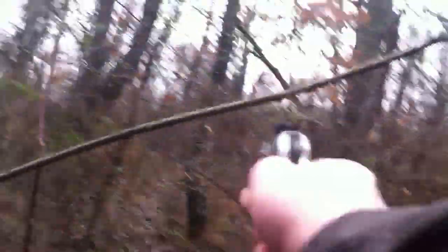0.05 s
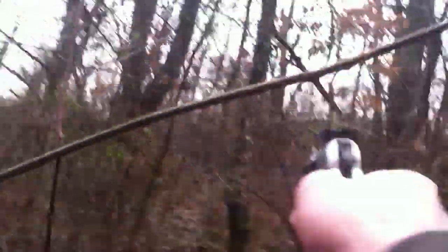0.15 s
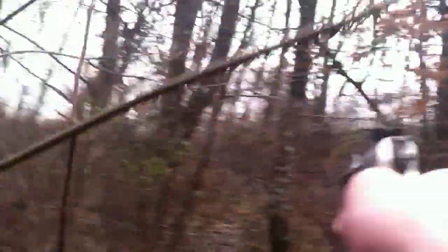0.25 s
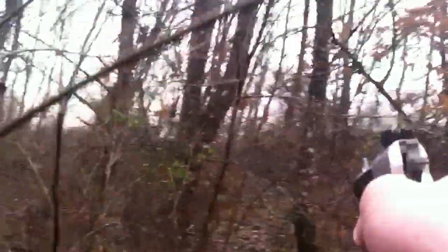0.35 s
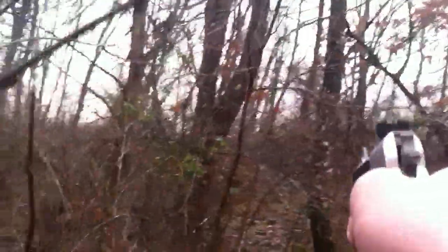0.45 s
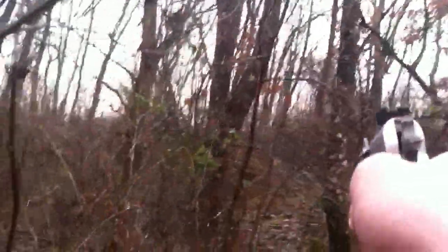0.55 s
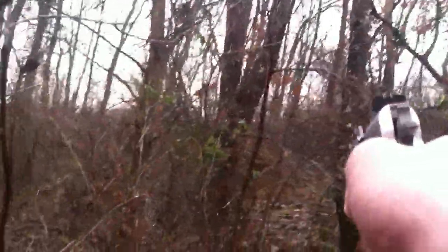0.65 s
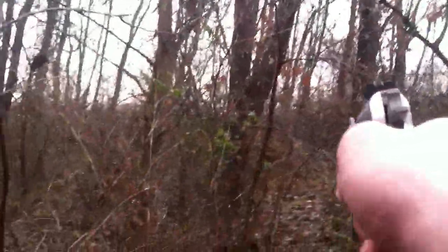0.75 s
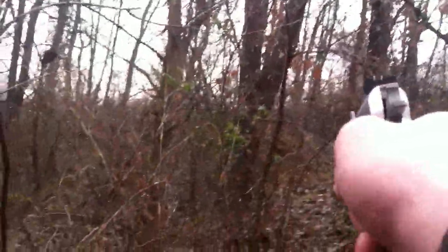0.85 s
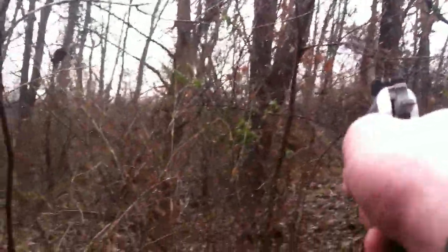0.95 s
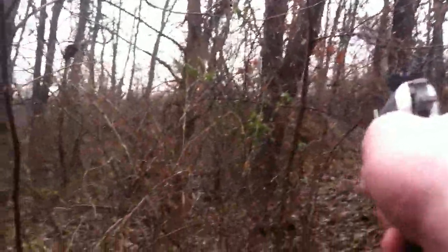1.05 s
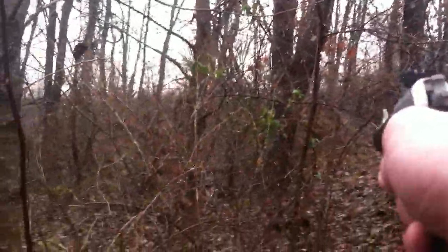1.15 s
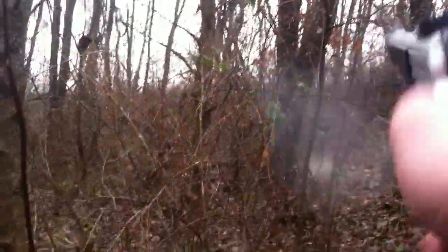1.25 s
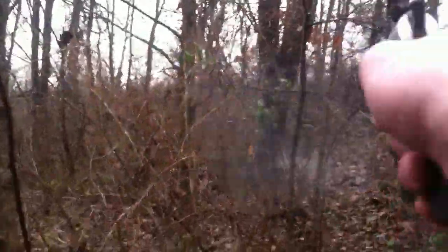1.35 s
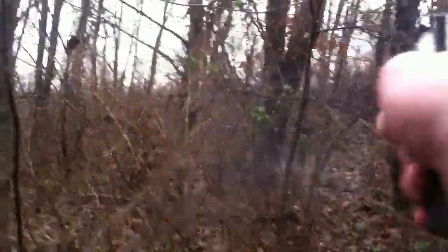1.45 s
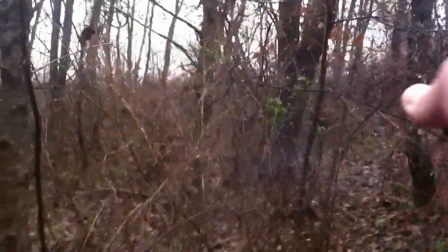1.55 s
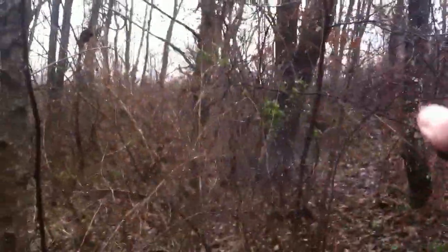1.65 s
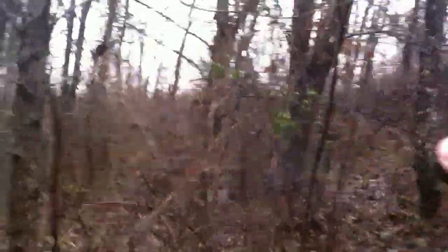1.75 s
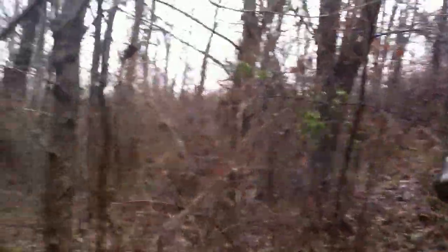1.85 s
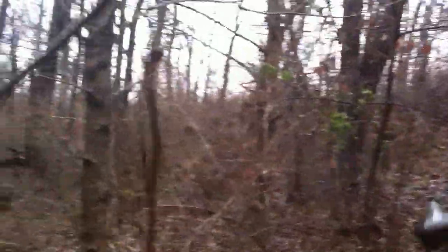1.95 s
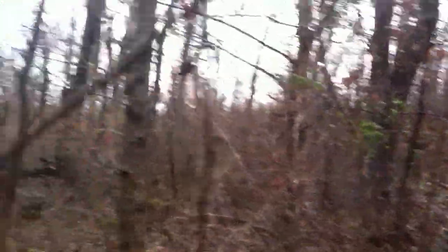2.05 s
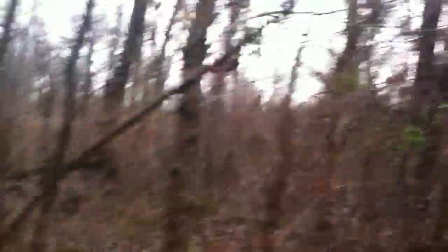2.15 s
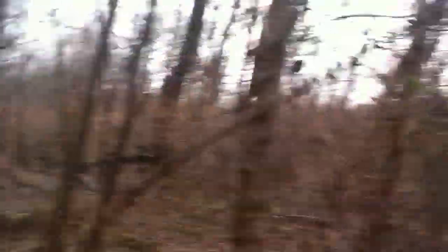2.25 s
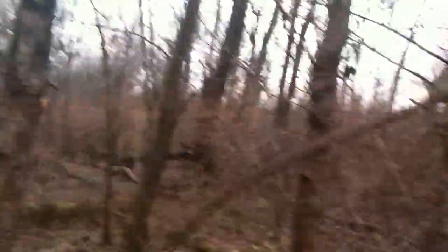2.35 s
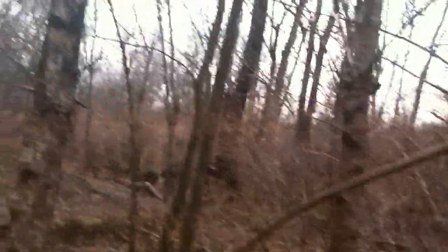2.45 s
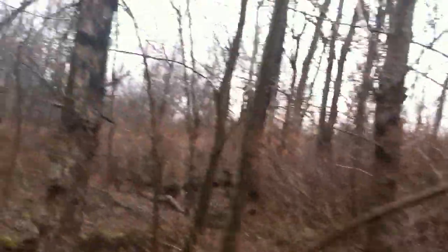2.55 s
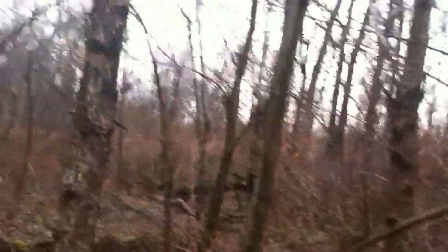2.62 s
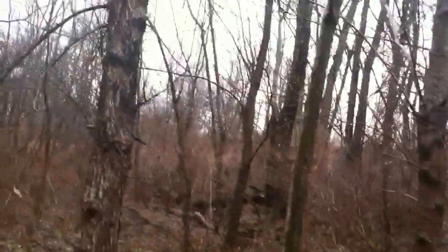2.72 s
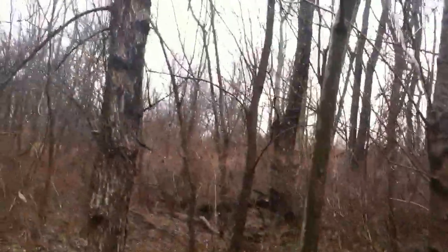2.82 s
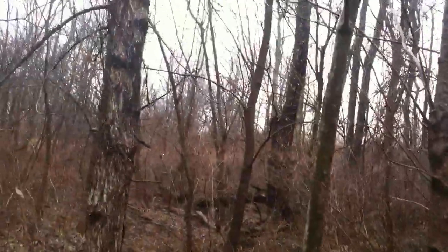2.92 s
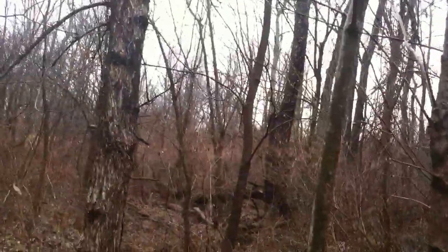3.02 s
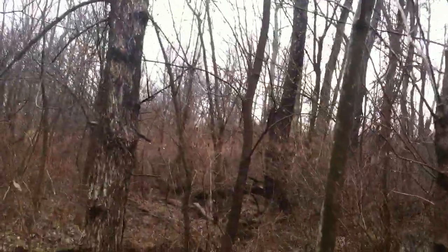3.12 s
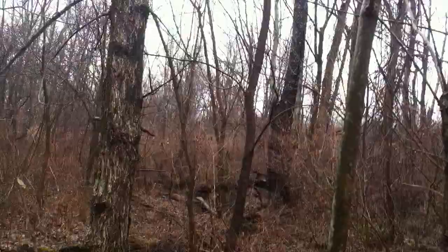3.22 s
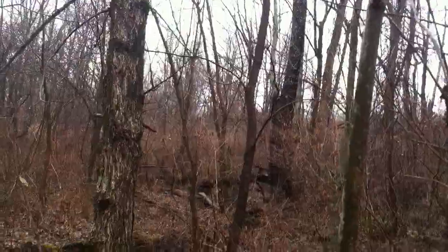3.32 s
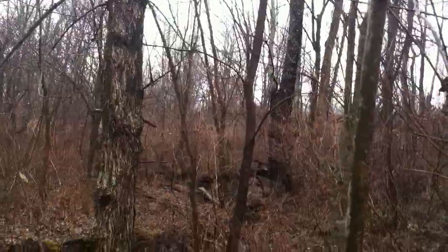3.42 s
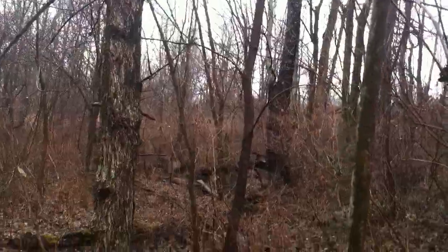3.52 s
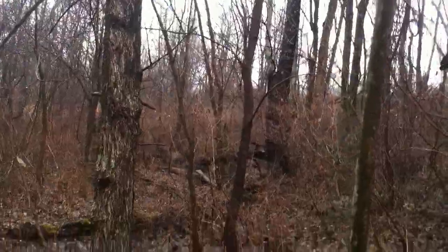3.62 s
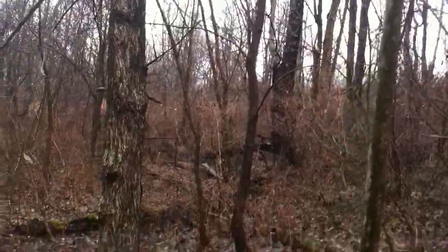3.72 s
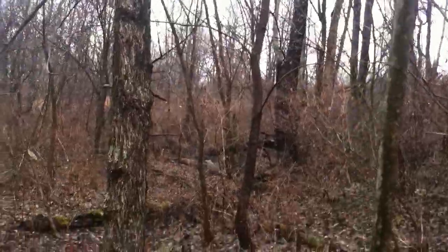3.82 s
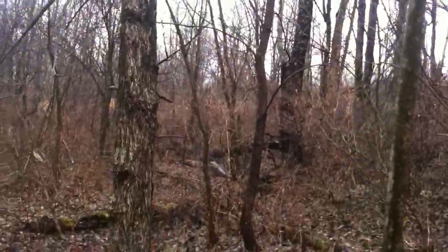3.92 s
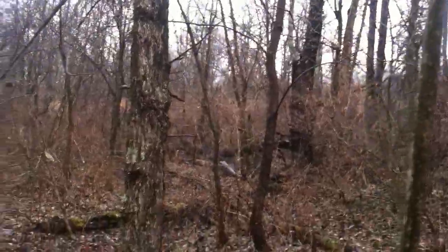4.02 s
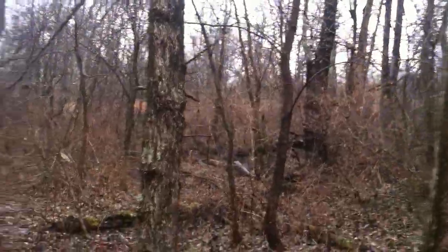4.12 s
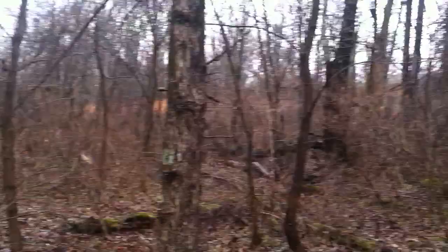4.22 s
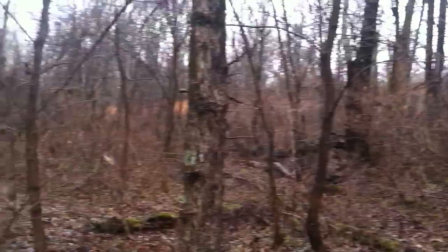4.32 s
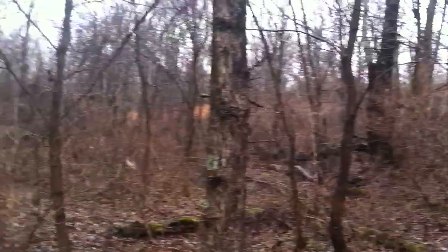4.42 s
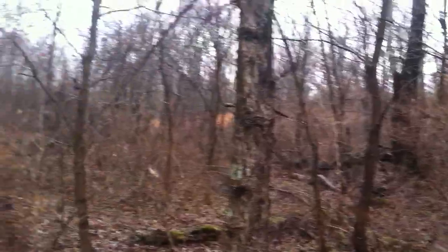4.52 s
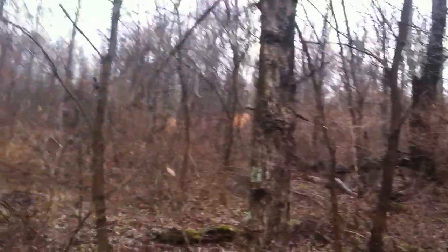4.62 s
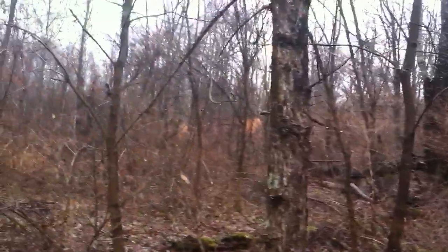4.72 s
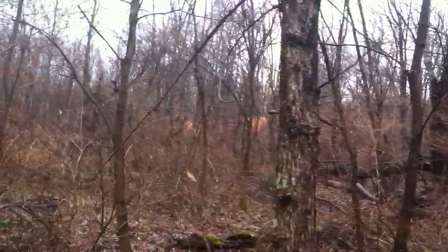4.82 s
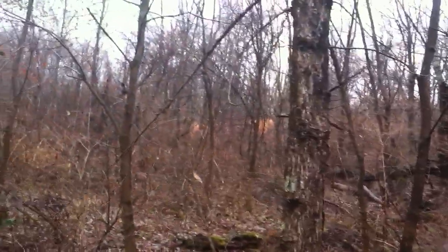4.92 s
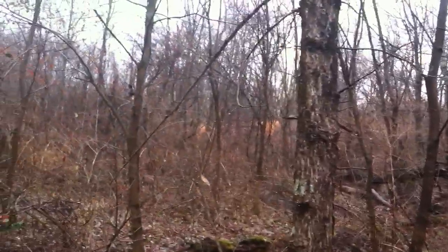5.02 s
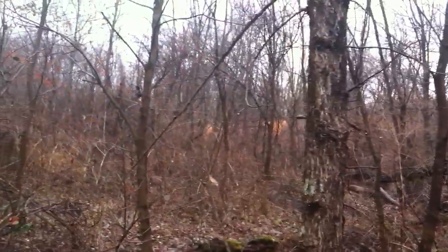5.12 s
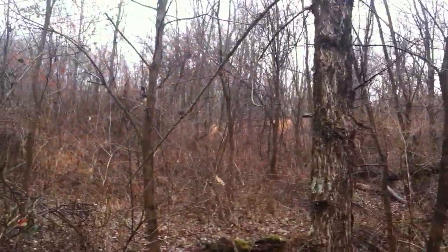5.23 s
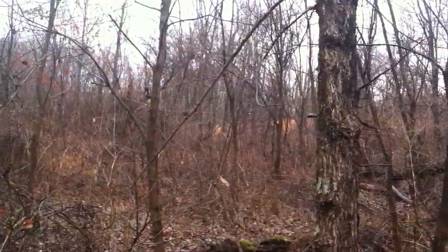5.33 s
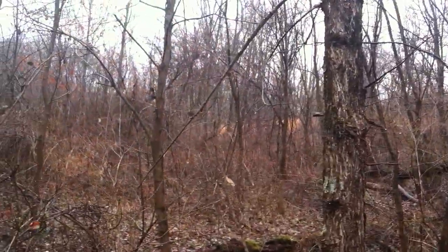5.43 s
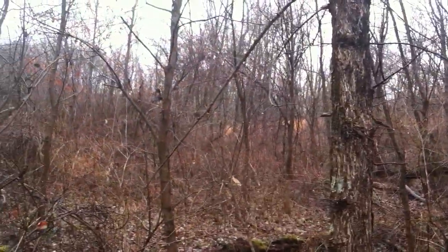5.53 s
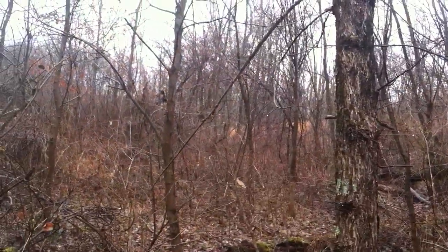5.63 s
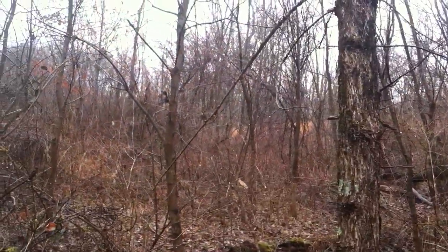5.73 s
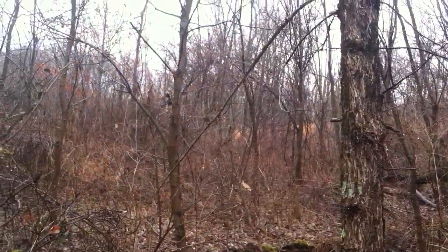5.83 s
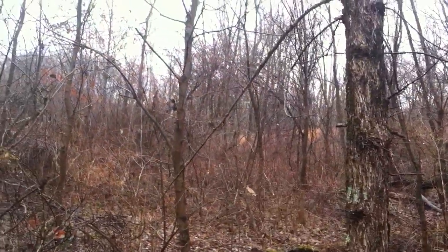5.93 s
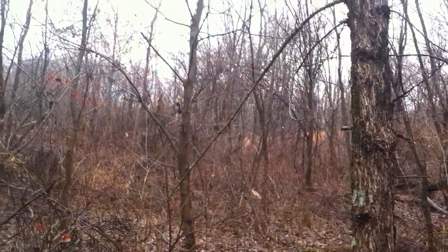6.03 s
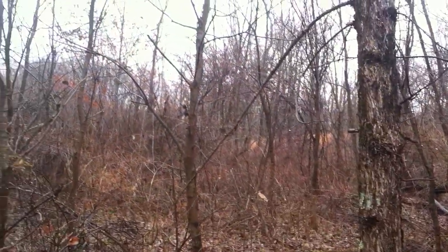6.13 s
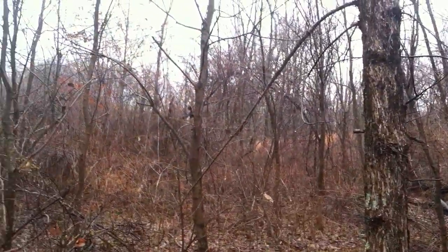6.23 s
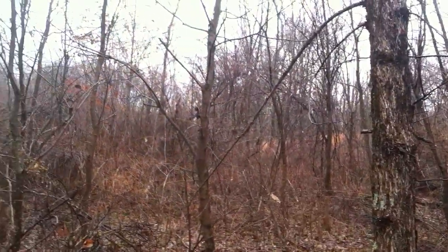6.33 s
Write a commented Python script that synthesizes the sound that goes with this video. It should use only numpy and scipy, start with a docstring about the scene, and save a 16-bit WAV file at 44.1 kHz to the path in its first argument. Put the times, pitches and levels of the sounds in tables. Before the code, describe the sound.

In an open, leafless wood, several hounds bay in overlapping hoarse voices amid wind buffets and twig snaps. A handgun clicks beside a phone microphone, then fires: a blunt, clipped blast that briefly chokes the sound before a scattered echo. Quiet, then a yelp and a second, crisper shot from further off with a long tail. Boots crunch leaves, twigs tick, and a few bays return at the end.

```python
"""Hounds bay in a bare wood: each voice is a stack of wavering partials with the wood's echo behind it.
A handgun fired beside a phone adds clicks, a crack and churning gas; its microphone is pinned for a moment.
A second shot follows from further off. Trunks scatter the sounds into tails of fading noise bands.
Twigs and boots make short rings and grains; wind makes noise and low swings; a low hum wavers and falls overall."""
import sys
import numpy as np
from scipy import signal
from scipy.fft import rfft, irfft, next_fast_len
from scipy.io import wavfile
from scipy.ndimage import uniform_filter1d

SR = 44100
rng = np.random.default_rng(int(sys.argv[2]) if len(sys.argv) > 2 else 0)


def inscribe(sig):
    """Save sig as 16-bit PCM at rate SR to the path in sys.argv[1].

    A 1-D sig is mono; a 2-D sig holds one channel per row.
    Samples are clipped to [-1, 1] before scaling.
    """
    pcm = np.round(np.clip(np.atleast_2d(sig).T, -1, 1) * 32767)
    wavfile.write(sys.argv[1], SR, pcm.astype(np.int16))


N = 280917
TIME = np.arange(N) / SR  # seconds


def undb(db):
    """Turn decibels into an amplitude factor."""
    return 10 ** (np.asarray(db) / 20)


def unit(x):
    """Scale a sound to an rms of 1."""
    return x / np.sqrt(np.mean(x ** 2))


def spectrum_gain(size, points):
    """Gain at each FFT frequency, drawn through (frequency [Hz], level [dB]) points."""
    hz, db = np.transpose(points)
    f = np.maximum(np.arange(size // 2 + 1) * SR / size, 1)
    return undb(np.interp(np.log(f), np.log(hz), db))


def coloured(x, points):
    """Shape the spectrum of x, then scale it to rms 1, so only the balance of the points counts."""
    size = next_fast_len(len(x), True)
    return unit(irfft(rfft(x, size) * spectrum_gain(size, points), size)[:len(x)])


def tinted(x, points):
    """Shape the spectrum of x without rescaling it afterwards."""
    size = len(x) + SR
    return irfft(rfft(x, size) * spectrum_gain(size, points), size)[:len(x)]


def noise(size=N):
    """White noise."""
    return rng.standard_normal(size)


def walk(rate, size=N):
    """Slowly wandering random curve: levels held for 1 / rate seconds, then smoothed twice; spread near 1."""
    hold = int(SR / rate)
    steps = np.repeat(noise(size // hold + 1), hold)
    smooth = uniform_filter1d(uniform_filter1d(steps, hold), hold)
    return 1.3 * smooth[:size]  # smoothing shrinks the spread


def add(out, s, sound):
    """Mix a sound in at time s [s]."""
    i = int(s * SR)
    out[i:i + len(sound)] += sound[:N - i]


def rings(rows, shape=np.sin):
    """Each row strikes one dying tone, at most 4000 samples long; a cosine starts with a snap."""
    out, t = np.zeros(N), TIME[:4000]
    for s, db, hz, t60 in rows:
        fade = undb(db - 60 * t / max(t60, .001))  # the fall by 60 dB takes at least 1 ms
        add(out, s, fade * shape(2 * np.pi * hz * t))
    return out


def swells(rows, sag=0., octave_db=-200, push_db=-200):
    """Each row is a low swing that swells and fades about its centre, with an octave and a slow push."""
    out = np.zeros(N)
    for s, db, hz, half in rows:
        t = np.arange(-3 * half, 3 * half, 1 / SR)
        phase = 2 * np.pi * hz * (t - sag * t ** 2 / (2 * half))  # the pitch sags steadily
        swing = np.cos(phase) + undb(octave_db) * np.cos(2 * phase) + undb(push_db)
        bell = np.exp(-.5 * (t / half) ** 2)
        add(out, max(s + t[0], 0), -undb(db) * bell * swing)
    return out


def woods(size):
    """Echo response of the wood: each band dies quickly among near trunks, slowly over far ground."""
    # what the trunks send back: (band [Hz], near level [dB], near 60 dB decay [s],
    #                            far level [dB], far 60 dB decay [s])
    bands = [(117, 0.5, 0.3, -32.5, 1), (325, -10, 0.71, -51.5, 1.38), (521, -8, 0.3, -25, 3.21),
             (1110, -16.5, 0.72, -34, 4.2), (1726, -10, 0.53, -28, 2.96), (3340, -13.5, 0.65, -36, 1.87),
             (7260, -17.5, 0.64, -71.5, 1.4), (8050, -18, 0.5, -115, 1.5), (12500, -59, .55, -73, 1.5)]
    trunk_grain_db, clump_db = 1.2, 1.8  # unevenness in all bands at once, and in each band alone
    out, t = np.zeros(size), TIME[:size]
    trunks_db = trunk_grain_db * walk(250, size)
    for hz, near_db, near_t60, far_db, far_t60 in bands:
        hump = [(hz / 4, -50), (hz / 2, -10), (hz, 0), (hz * 2, -12), (hz * 4, -55)]
        band = coloured(noise(size), hump)
        clumps_db = trunks_db + clump_db * walk(120, size)
        near = undb(near_db - 60 * t / near_t60)
        far = undb(far_db - 60 * t / far_t60)
        out += band * undb(clumps_db) * (near + far)
    return out


def wet(x, echo_db):
    """Add the wood's answer to a sound, by convolving it with an echo response of unit energy."""
    echo = woods(size=2 * SR)
    echo = echo / np.sqrt(np.sum(echo ** 2))
    return x + undb(echo_db) * signal.fftconvolve(x, echo)[:N]


def air(air_db):
    """Air and far rustle: coloured noise with a slightly wandering level."""
    # balance of the noise: (frequency [Hz], level [dB per Hz])
    colour = [(94, -41), (160, -22.5), (234, -2), (278, -0.5), (398, 8.5), (594, 6.5), (1290, 6.5),
              (2610, 1), (3280, -4), (7710, -8), (15000, -22.5)]
    return coloured(noise(), colour) * undb(air_db + 0.39 * walk(11))


def wind(rumble_db):
    """Gusts push the microphone port in uneven low swings, over a wandering noise rumble."""
    # balance of the rumble: (frequency [Hz], level [dB per Hz])
    colour = [(30, -10), (70, -6), (120, -2), (200, 0.0), (280, -6), (500, -24), (1000, -60)]
    # gusts: (centre [s], swing level [dB], swing [Hz], half length [s])
    gusts = [(0.033, -33.5, 238, 0.0036), (.345, -33.5, 118, .008), (.364, -35, 129, 0.0064),
             (.41, -44, 148, 0.014), (0.444, -29, 200, 0.0024), (.46, -50, 192, 0.0068),
             (0.489, -29, 160, 0.0051), (.51, -40, 175, 0.013), (.555, -39, 130, .008),
             (.58, -38, 139, 0.011), (0.616, -29.5, 188, 0.0025), (0.657, -34, 160, 0.0079),
             (0.721, -28.5, 176, 0.0037), (.74, -42, 197, 0.0058), (.77, -42, 170, .01),
             (.795, -38, 140, 0.0046), (0.815, -30.5, 157, 0.0032), (0.848, -44, 149, 0.0099),
             (0.9, -37, 146, 0.0073), (0.938, -43, 168, .007), (.96, -38, 138, 0.0086),
             (1.0, -41, 169, 0.0064), (1.075, -39, 138, 0.006), (2.175, -40, 130, 0.0065)]
    rumble = coloured(noise(), colour) * undb(rumble_db + 2.2 * walk(25.084))
    return rumble + swells(gusts, push_db=2)  # slow push of air, in dB over each swing


def hum():
    """A soft low hum in swells that waver and fall overall, each sagging in pitch, with a weaker octave."""
    # swells: (centre [s], level of the main tone [dB], pitch [Hz], half length [s])
    notes = [(2.452, -54, 313, .012), (2.48, -53, 389, 0.024), (2.51, -55, 200, 0.013),
             (2.547, -48, 250, 0.0083), (2.585, -39.5, 202, 0.0096)]
    return swells(notes, sag=0.03, octave_db=-17)  # sag is a share of the pitch per half length


def leaves():
    """Boots crush leaves: dense noise grains build to a snap and scatter away; a few crackle all the time."""
    # footfalls: (time [s], level [dB], build-up [s], 60 dB decay of the scatter [s])
    crunches = [(4.465, -37.5, 0.0079, 0.59), (4.577, -51, 0.0011, 0.38), (4.643, -38.5, 0.011, 0.35)]
    # balance of the grains: (frequency [Hz], level [dB per Hz])
    colour = [(410, -17.5), (700, -14.5), (1510, 0), (1830, 2.5), (2460, 0), (3180, 0.5), (7900, -3),
              (15000, -19.5)]
    grains = noise() * undb(2.5 * np.minimum(rng.exponential(size=N), 8))
    shape = undb(-72.0 + 3.0 * walk(25))  # the constant crackle
    for s, db, rise, t60 in crunches:
        build = np.exp(np.minimum(TIME - s, 0) / rise)
        after = np.maximum(TIME - s, 0)
        scatter = .65 * np.exp(-after / .004) + .35 * undb(-60 * after / t60)
        shape = shape + undb(db) * np.where(TIME < s, build, scatter)
    return coloured(grains, colour) * shape


def ticks():
    """Gun clicks, snapping twigs and a random scatter of faint ones, each a short ring with a trace of wood."""
    # twigs that snap: (time [s], level [dB], ring [Hz])
    snaps = [(0.0294, -20, 4020), (0.057, -26, 3870), (.149, -26, 3020), (0.179, -30, 3200),
             (.503, -41, 4070), (1.026, -29, 3930), (2.457, -34.5, 3820), (1.211, -35, 3750),
             (1.318, -38, 3220), (2.896, -44, 6000), (2.917, -40, 3800), (3.1015, -38, 2700),
             (3.1017, -36, 6800), (3.108, -42, 7500), (3.216, -42, 6200), (3.266, -44, 1900),
             (3.464, -41, 2700), (3.548, -39, 3870), (3.534, -37, 5900), (4.4634, -19, 1940),
             (4.639, -24, 3070), (4.953, -28, 1580), (5.099, -36, 3460), (5.2336, -34, 2700),
             (5.42, -37, 8100), (5.478, -30.5, 6500), (5.539, -28, 7500), (5.771, -34, 6200)]
    # metal of the handgun, cocked, fired and settling: (time [s], level [dB], ring [Hz], 60 dB decay [s])
    clicks = [(.7255, -7, 10800, 0.00073), (.7257, -7, 1890, 0.0032), (1.3685, -13, 6150, 0.0066),
              (1.3758, 3.5, 8200, 0.0035), (1.386, -18.5, 5870, 0.0048), (1.5873, -10.5, 8200, 0.0034)]
    twig_cycles = 7  # cycles until a snapped twig is 60 dB down, but see the shortest decay in rings()
    faint_count, faint_db, faint_spread_db = 70, -47, 4  # evenly spread by this much either way
    low_hz, high_hz, faint_t60_s = 3000, 10000, .0015
    rows = [(s, db, hz, twig_cycles / hz) for s, db, hz in snaps]
    for when, size, tone in rng.random((faint_count, 3)):
        db = faint_db + faint_spread_db * (2 * size - 1)
        rows.append((when * N / SR, db, low_hz + tone * (high_hz - low_hz), faint_t60_s))
    return wet(rings(clicks, np.cos) + rings(rows), echo_db=-17.5)


def n_wave(length_s):
    """Pressure that jumps up, falls in a straight line to the opposite side and stops."""
    return 1 - 2 * np.arange(0, length_s, 1 / SR) / length_s


def muzzle_gas():
    """Gas of the near shot churning round the phone: coloured noise that follows a level curve."""
    # (time [s], level [dB])
    curve = [(1.3769, -1), (1.381, 2), (1.386, -8.5), (1.391, -4), (1.407, -6)]
    # balance of the noise: (frequency [Hz], level [dB per Hz])
    colour = [(100, -15), (330, -7), (510, 5), (720, -13), (1000, -5), (1400, -5.5), (2500, -15),
              (8000, -23), (16000, -31)]
    s, db = np.transpose(curve)
    return coloured(noise(), colour) * undb(np.interp(TIME, s, db, left=-200, right=-200))


def guns():
    """Each shot is an N-shaped crack, its inverted ground wave and a tail; short rings are added."""
    # (time [s], crack level [dB], crack length [s], ground wave level [dB], its length [s], tail level [dB])
    shots = [(1.3769, -42, 0.00065, 3, .002, -10.5), (3.6145, -3, 0.00057, 15, 0.002204, -10)]
    # tint of each shot's tail, from the way the gun points: one list per shot of (frequency [Hz], level [dB])
    tail_colours = [
        [(115, 0), (280, -6.5), (540, -3), (900, 1.5), (1300, 0.5), (1760, -2.5), (3400, -1.2), (8000, 2.5)],
        [(115, -11.5), (280, -11), (540, -4.5), (1200, -1), (1760, -1), (3400, -2.3), (8000, -0.3)],
    ]
    # short rings within the shots and their echoes: (time [s], level [dB], ring [Hz], 60 dB decay [s])
    shot_rings = [(1.496, -13.5, 920, 0.022), (1.507, -14.5, 1330, 0.021), (1.565, -12.5, 527, 0.0053),
                  (1.878, -28.5, 555, 0.052), (1.755, -36.5, 337, 0.12), (3.6144, 12, 1890, 0.0084),
                  (3.6172, -26, 915, 0.0061), (3.6184, 3, 1400, 0.0009), (3.633, -17, 1210, 0.0053),
                  (3.6445, -8, 528, 0.039), (3.66, -34, 1500, 0.0068), (3.694, -16, 890, 0.012),
                  (3.698, -15, 1800, 0.0069), (3.725, -16, 710, 0.015), (4.075, -35.5, 490, 0.037),
                  (1.526, -14, 720, 0.013), (1.582, -20, 910, 0.027), (1.607, -22.5, 710, 0.023),
                  (1.845, -42, 500, 0.014), (1.908, -31, 547, 0.02), (1.96, -33, 530, 0.063)]
    out = rings(shot_rings)
    tail_size = 4 * SR
    onset = 1 - np.exp(-TIME[:tail_size] / 0.00023)
    for (s, crack_db, crack_s, ground_db, ground_s, tail_db), colour in zip(shots, tail_colours):
        add(out, s, undb(crack_db) * n_wave(crack_s))
        add(out, s + crack_s, -undb(ground_db) * n_wave(ground_s))
        tail = tinted(woods(tail_size), colour) * onset
        add(out, s + crack_s + ground_s, undb(tail_db) * tail)
    return out + muzzle_gas()


def throat(hz):
    """Gain in dB of the throat and of the way through the trees at each pitch."""
    # (frequency [Hz], gain [dB])
    passage = [(500, -1.5), (1200, -0.5), (1750, -3.5), (2400, -6), (2800, -11.5), (3600, -29)]
    return np.interp(hz, *np.transpose(passage))


def pack():
    """Each bay glides through three pitches; its partials pass the throat and flutter alone, more if rough."""
    # bays: (voice, start [s], length [s], start pitch [Hz], turning pitch [Hz], end pitch [Hz],
    #        place of the turn [0-1], roughness [0-1], level [dB], swell from start to end [dB],
    #        upper partials [dB], their sinking as the mouth closes [dB])
    bays = [("deep", 0, .2, 617, 618, 590, .5, .4, -46, -3, 3, 7),
            ("nasal", .015, .17, 655, 640, 610, .5, .3, -45, -3, 1.5, 8),
            ("bright", .1, .12, 625, 595, 570, .5, .35, -50, 1.5, 4, 3),
            ("shrill", .175, .27, 585, 570, 582, .2, .25, -48, -6, 1.5, 5),
            ("reedy", .22, .12, 665, 580, 578, .6, .15, -46, 3, 1.5, 3),
            ("deep", .485, .045, 585, 580, 570, .5, .5, -49, -3, -6, 3),
            ("shrill", .505, .05, 540, 545, 548, .5, .5, -52, -3, 1.5, 3),
            ("nasal", 1.02, .14, 520, 545, 580, .5, .6, -52, 1.5, 1.5, 3),
            ("nasal", 1.2, .165, 625, 570, 520, .5, .8, -52, 1.5, 1.5, 3),
            ("bright", .225, .11, 655, 640, 645, .5, .45, -52, 1.5, 3, 3),
            ("deep", .312, .125, 580, 600, 560, .4, .5, -43, -5, -3, 3),
            ("nasal", .38, .24, 540, 570, 575, .5, .8, -51, -3, -2, 3),
            ("bright", .51, .2, 545, 550, 565, .3, .6, -53, -3, 4, 5),
            ("deep", .54, .24, 690, 725, 690, .5, .7, -54, 1.5, -2, 3),
            ("deep", .66, .035, 890, 880, 880, .5, .5, -53, -3, -12, 3),
            ("hazy", .72, .22, 580, 560, 560, .5, .9, -50, 1.5, 1.5, 3),
            ("deep", .78, .16, 629, 660, 612, .5, .6, -44, -3, -6, 10),
            ("hazy", .92, .13, 575, 595, 600, .4, .7, -50, 1.5, 1.5, 3),
            ("deep", 1.005, .15, 595, 618, 598, .6, .5, -41, -3, 1.5, -3),
            ("deep", .97, .17, 561, 550, 544, .5, .85, -52, 1.5, -3, 3),
            ("yelp", 1.15, .2, 690, 700, 630, .3, .7, -54, -4, 1.5, 3),
            ("reedy", 1.152, .055, 705, 650, 615, .5, .2, -50, -3, 1.5, 3),
            ("hazy", 1.17, .2, 605, 590, 551, .5, .8, -52, -3, 1.5, -3),
            ("clear", 3.142, .2, 625, 550, 605, .52, .3, -54, 3, -1.5, 12),
            ("deep", 3.255, .09, 580, 605, 610, .5, .3, -52, -3, -5, 3),
            ("yelp", 3.478, .045, 620, 775, 790, .5, .2, -55, 3, 1.5, 3),
            ("yelp", 3.508, .106, 785, 645, 500, .55, .25, -44, 1.5, 1.5, 6),
            ("yelp", 3.55, .062, 725, 725, 735, .5, .5, -53, 1.5, 1.5, 3),
            ("deep", 3.562, .05, 620, 657, 680, .5, .3, -47, 3, -8, 3),
            ("deep", 5.842, .04, 740, 710, 690, .5, .2, -51, 1.5, -15, 3),
            ("clear", 5.852, .175, 640, 568, 640, .42, .15, -50, 10, 3, 12),
            ("deep", 6.0, .14, 640, 640, 630, .5, .25, -52, -4, -3, 3),
            ("deep", 6.12, .13, 620, 605, 600, .5, .3, -61, -4, -14, 3),
            ("clear", 6.245, .17, 510, 552, 546, .2, .14, -52, 5, 1.5, 10)]
    # voice name: levels of partials 1-6 [dB]
    voices = {"deep": (0, -6, -13, -17, -22, -32), "bright": (0, -10, -2, -7, -14, -24),
              "nasal": (-6, 0, -16, -6, -16, -28), "shrill": (-8, -6, 0, -10, 3, 8),
              "yelp": (-22, 0, -26, -4, -18, -28), "reedy": (-12, -6, -8, 4, -12, -28),
              "clear": (0, -5, -1, -6, -9, -24), "hazy": (-2, -4, -4, -7, -10, -22)}
    # voice name: how late partials 1-6 come in while the mouth opens [s]
    opening = {"clear": (0, .035, 0, .025, .09, .09), "yelp": (0, 0, 0, .015, .015, 0)}
    attack_s, release_s, glide_s = 0.005, 0.036, .03  # glide_s rounds the pitch turns
    waver, flutter_db, hoarse = .021, 4.5, 1.0  # per unit of roughness; waver is a share of the pitch
    out = np.zeros(N)
    for (voice, s, length, start_hz, turn_hz, end_hz, turn, rough,
         db, swell_db, upper_db, closing_db) in bays:
        t = TIME[:int(length * SR)]
        u = t / length  # progress 0-1
        edge = np.clip(np.minimum(t / attack_s, (length - t) / release_s), 0, 1)
        arc = np.interp(u, [0, turn, 1], [start_hz, turn_hz, end_hz])
        arc = uniform_filter1d(arc, int(glide_s * SR), mode="nearest")
        pitch = arc * (1 + waver * rough * walk(77.8, SR // 2)[:len(t)])
        phase = 2 * np.pi * np.cumsum(pitch) / SR
        mouth_db = upper_db + closing_db * (.5 - u)
        delays = opening.get(voice, [0] * 6)
        for k, colour_db in enumerate(voices[voice]):
            upper = k > 0  # the lowest partial ignores the mouth and the smear
            throat_db = throat((k + 1) * pitch) + mouth_db * upper
            flutter = flutter_db * rough * walk(70.0, SR // 2)[:len(t)]
            gain = undb(db + swell_db * (u - .5) + colour_db + throat_db + flutter)
            # uneven folds smear the upper partials
            smear = 1 + hoarse * rough * upper * walk(500, SR // 2)[:len(t)]
            opened = np.clip(1 + (t - delays[k]) / attack_s, 0, 1)
            partial = np.sqrt(2) * np.sin((k + 1) * phase)
            add(out, max(s, 0), opened * edge * gain * smear * partial)
    return out


def scene():
    """Mix the background, the guns and the hounds with their echo."""
    # background: (time [s], air and far rustle level [dB], wind rumble level [dB])
    ambience = [(0, -41.5, -54), (.3, -51, -57.5), (.45, -50, -52), (0.698, -55, -53), (1.05, -54.5, -59),
                (1.298, -54.5, -58), (1.8, -57.5, -51), (2.299, -56, -59.5), (2.602, -56, -58.5),
                (3.0, -55.5, -56), (3.501, -57, -60.5), (4.799, -58, -68), (5.5, -57, -66.5),
                (5.9, -57.5, -63.5), (6.37, -57, -63.5)]
    s, *columns = np.transpose(ambience)
    air_db, rumble_db = (np.interp(TIME, s, column) for column in columns)
    background = air(air_db) + wind(rumble_db) + hum()
    hounds = wet(pack(), echo_db=-4.5)
    return (background + leaves() + ticks() + guns() + hounds)[None]


def record(dry):
    """The microphone clips at its rails, nearly deaf while pinned; the low cut rings at each jump."""
    # working point of the shaken microphone: (time [s], offset [1 = full scale])
    stun = [(1.377, 0), (1.382, -.85), (1.391, -.85), (1.394, 0), (1.405, -.1), (1.4085, -4), (1.4706, -4),
            (1.4722, 4), (1.4855, 4), (1.4875, .4), (1.5, .22), (1.6, 0)]
    rail, limit = .385, .715  # hard clipping levels before and after the low cut
    capsule_hz, low_cut_hz, top_hz = 10000, 160, 15700
    slip_s, slip_db = 1.4243, -38  # the capsule slips once, by a small lasting step
    seep_db, leak_db = -62, -21.5  # sound that seeps past the rails; deep bass that passes the low cut

    def filtered(x, sos):
        return signal.sosfilt(sos, x)

    offset = np.interp(TIME, *np.transpose(stun), left=0, right=0)
    pinned = np.clip(dry + offset, -rail, rail)
    pinned = pinned + undb(seep_db) * dry + undb(slip_db) * (TIME > slip_s)
    soft = filtered(pinned, signal.butter(2, capsule_hz, fs=SR, output="sos"))
    cut = filtered(soft, signal.butter(4, low_cut_hz, "high", fs=SR, output="sos"))
    bass = filtered(soft, signal.butter(1, [35, 90], "band", fs=SR, output="sos"))
    limited = np.clip(cut + undb(leak_db) * bass, -limit, limit)
    return filtered(limited, signal.ellip(8, .2, 80, top_hz, fs=SR, output="sos"))


dry = scene()
out = record(dry)
inscribe(out)
```